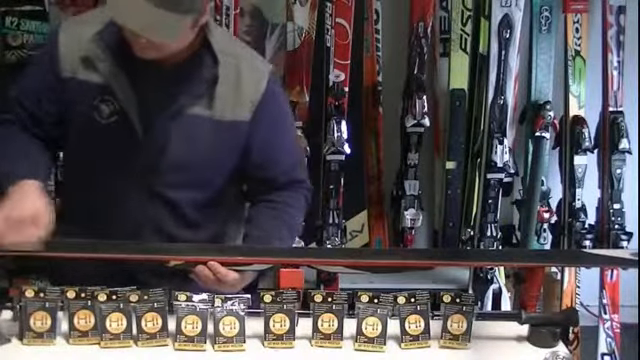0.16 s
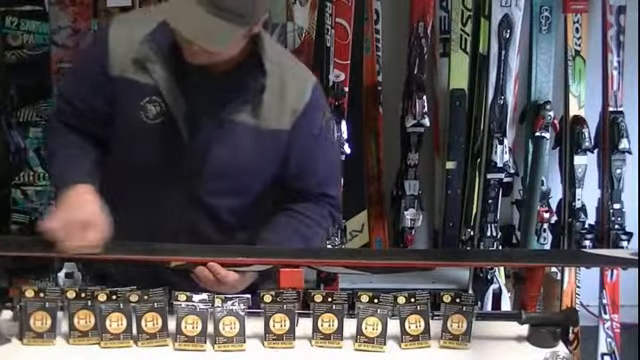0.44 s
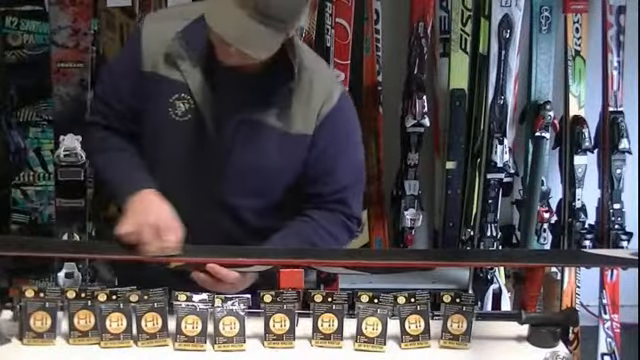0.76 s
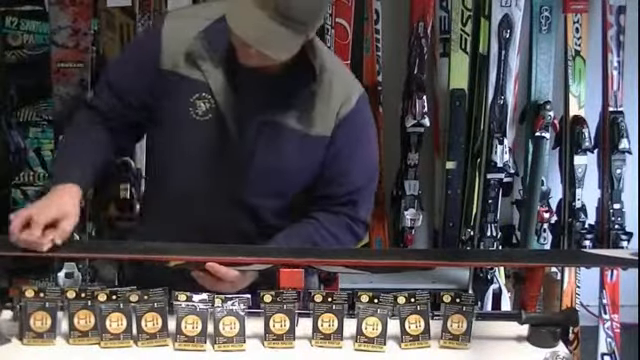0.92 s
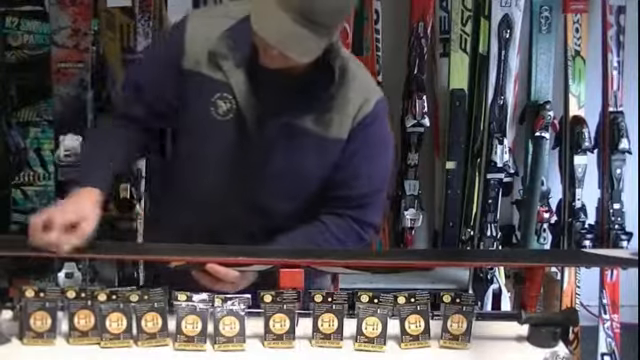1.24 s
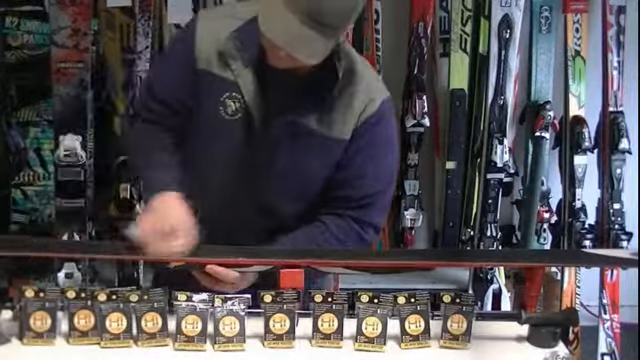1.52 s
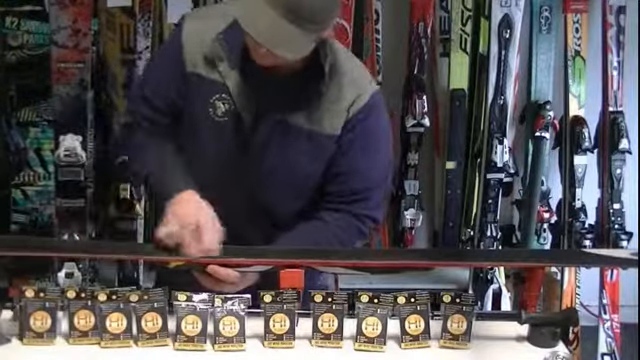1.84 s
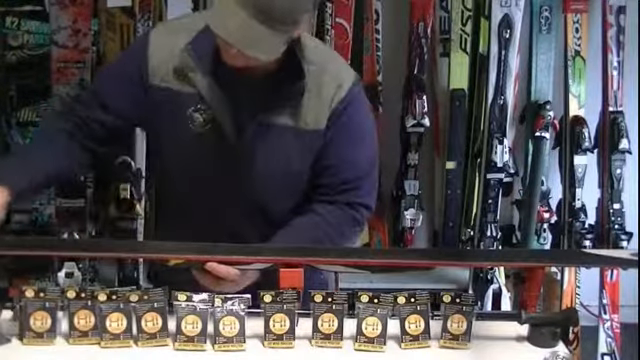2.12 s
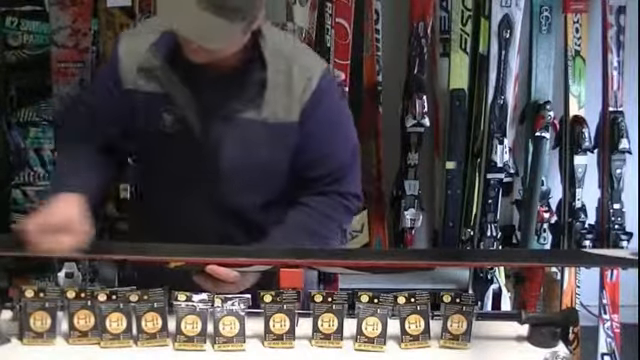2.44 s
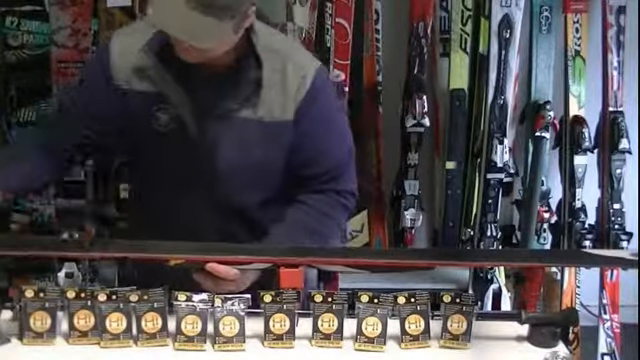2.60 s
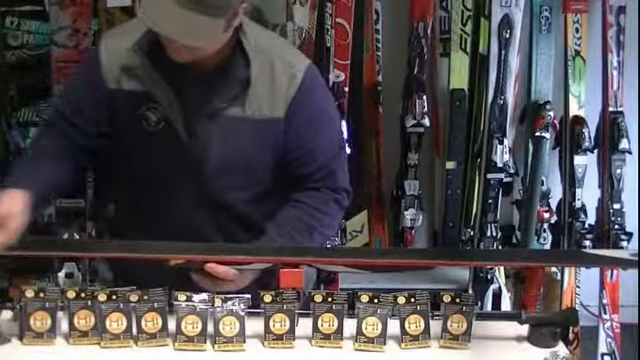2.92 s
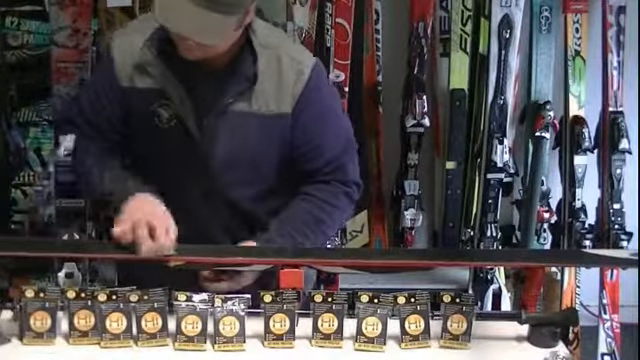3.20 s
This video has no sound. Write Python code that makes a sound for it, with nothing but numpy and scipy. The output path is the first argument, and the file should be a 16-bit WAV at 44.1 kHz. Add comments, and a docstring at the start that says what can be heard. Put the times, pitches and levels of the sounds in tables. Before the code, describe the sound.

Wax is rubbed on a ski base, already moving at 0 s: brisk strokes of about 0.17 s each, nearly six per second, until 2 s. One longer stroke spans 2.0-2.3 s, then strokes of about 0.2 s continue to the end near 3.4 s. Each swells into grainy scrape and bright hiss over hollow, woody ringing, dipping at turns; little knocks and squeaky scrapes vary it. Close, small room, faint floor.

```python
"""Wax is rubbed back and forth along a ski base clamped to a bench, already moving as the sound begins.
Quick strokes run to about 2 s, one longer stroke follows, then slightly slower ones last to the end.
Each stroke speeds up and slows to a turn: grainy friction noise scrapes, hisses, and rings the ski's modes.
Short coloured swells of noise, from low knocks to treble scrapes, dot the rubbing.
Short dense echoes and a phase-scattered side signal make the small room, over a faint steady floor."""
import sys
import numpy as np
from scipy import signal
from scipy.fft import rfft, irfft
from scipy.io import wavfile
from scipy.ndimage import map_coordinates

SR = 44100
rng = np.random.default_rng(int(sys.argv[2]) if len(sys.argv) > 2 else 0)


def output_pcm(signal):
    """Save a mono or channel-first signal as 16-bit PCM at the path in sys.argv[1].

    Samples are clipped to [-1, 1] before scaling.
    """
    pcm = np.clip(np.atleast_2d(signal).T, -1, 1) * 32767
    wavfile.write(sys.argv[1], SR, np.round(pcm).astype(np.int16))


N = 148176

# Background hiss: (frequency [Hz], level [dB per Hz])
FLOOR_COLOUR = [(20, -114), (60, -112), (120, -113), (300, -115), (2000, -120), (12000, -124)]
# Stereo spread: (frequency [Hz], side relative to mid [dB])
SIDE_LEVEL = [(60, -14), (250, -13), (500, -18), (1000, -14.5), (2000, -13), (4000, -8.5), (8000, -8),
              (12000, -10)]
# Stereo balance: (frequency [Hz], first channel relative to second [dB])
CHANNEL_LEAN = [(100, -0.86), (500, -.3), (1400, -0.11), (4200, 0.64), (8000, 1.5), (12000, 0)]
# Short coloured swells: (middle [s], length [s], resonance [Hz], level before SWELL_TRIM_DB [dB])
COLOURED_SWELLS = [(0.107, 0.034, 790, -52), (0.181, 0.02, 2280, -48), (0.353, 0.043, 7600, -50),
                   (0.419, 0.057, 1810, -43.5), (0.467, 0.02, 2600, -46), (.605, 0.036, 816, -53.5),
                   (0.77, 0.035, 1820, -46), (0.794, 0.039, 2350, -43), (1.025, 0.089, 8560, -48),
                   (1.143, 0.023, 1830, -55), (1.152, 0.046, 7400, -49), (1.184, .05, 2380, -46.5),
                   (1.253, .025, 2430, -46.5), (1.4, 0.033, 7600, -46.5), (1.438, .03, 2960, -47.5),
                   (1.535, 0.031, 820, -53), (1.587, .03, 1850, -47), (1.59, .035, 9500, -55),
                   (1.84, 0.023, 7540, -51), (1.863, .04, 1860, -53), (1.92, 0.041, 830, -55.5),
                   (2.192, 0.065, 1900, -50.5), (2.426, 0.028, 1670, -44), (2.54, 0.032, 1850, -53),
                   (2.573, 0.067, 847, -53.5), (2.688, 0.07, 3200, -47.5), (2.778, 0.04, 1750, -47),
                   (2.818, 0.046, 1680, -44.5), (2.893, 0.043, 8000, -43.5), (2.929, 0.034, 2470, -49),
                   (3.026, 0.028, 1750, -51), (3.095, 0.042, 720, -56), (3.21, .04, 880, -55),
                   (3.211, 0.03, 1660, -43.5), (3.243, 0.045, 3530, -49), (3.31, 0.061, 2380, -48)]
# Hand strokes: (start [s], share of the stroke at which it is fastest [0-1],
# roundness [factor on the speed exponent, under 1 bites at once], offset of the rub left at its first turn [dB],
# then offsets of ski body [dB], ski ring [dB], scrape [dB], hiss and fizz [dB])
HAND_STROKES = [(-.114, 0.44, 1.46, 6, 0, 0, 1.5, 1.5), (0.046, .58, 0.67, -2.5, 0.5, 1.4, 0.5, -2),
                (.224, 0.5, 1.16, 3, -1.5, -2.5, -1.3, -1.7), (.393, 0.47, 0.88, 1, 2, 0.5, 2, -0.3),
                (.574, 0.54, 0.92, 0, -0.4, -5, -1.3, -1), (.745, 0.47, 0.91, 1.5, 1, 1.5, -0.3, -1),
                (.938, 0.52, 0.87, 0.5, -2, -3, -0.8, -2.5), (1.103, 0.47, 0.8, -5, 0.2, 1, -2.5, -1.5),
                (1.278, .59, 0.9, 4, -1.5, -1.5, -3, -2.6), (1.46, 0.42, 0.95, -2.5, 1.5, 0, -0.5, -1.4),
                (1.635, 0.59, 0.84, 3, 0, -3.5, -3, -2.5), (1.81, .43, 0.75, -1, 0.5, -1, -2.5, -3.5),
                (1.984, 0.57, 0.85, 0, -1.8, 0, -1.5, -1.6), (2.334, 0.61, 1.1, 0.5, -0.6, 0.5, -0.8, -1),
                (2.557, 0.61, 1.07, 1.5, -1.3, 0.3, -1.3, 0.5), (2.747, 0.6, 0.86, 1, 1, 1.5, 0, -0.2),
                (2.954, 0.6, 1.05, 1, 0, -2.3, -1.1, 0.3), (3.153, 0.6, .9, 4, 0.2, 1.5, -0.5, 0)]
# Modes of the ski: (frequency [Hz], width [Hz], level at full speed before stroke offsets [dB per Hz])
RINGING_MODES = [(242, 16, -97), (333, 49, -99), (502.6, 28, -86), (603.4, 44, -88.5), (781, 32, -85),
                 (850.4, 39, -83), (955.5, 49, -85), (1131, 26, -83), (1646, 22, -77.5), (1751, 31, -77),
                 (1828, 41, -76), (1927, 31, -78.5), (2180, 23, -81.5), (2378, 59, -81.5), (2888, 48, -84),
                 (3380, 35, -84), (3713, 40, -84.5), (3956, 36, -84.5), (4260, 32, -85.5),
                 (5160, 79, -85.5)]
# Broad colours at full speed before stroke offsets: (frequency [Hz], level [dB per Hz])
BODY_COLOUR = [(40, -130), (120, -112), (185, -111), (235, -102), (350, -99), (430, -100), (520, -92),
               (720, -92.5), (830, -84.5), (1000, -92), (1300, -88.5), (1600, -88.5), (2500, -115)]
RING_COLOUR = [(250, -140), (900, -112), (1450, -95.5), (1600, -84.5), (1850, -88), (2050, -85.5),
               (2600, -88.5), (5000, -120)]
SCRAPE_COLOUR = [(250, -140), (1000, -110), (1800, -92.5), (2250, -84.5), (2500, -84), (2680, -85),
                 (2900, -83.5), (3500, -85), (4400, -87), (5500, -91), (8000, -102), (12500, -112)]
HISS_COLOUR = [(300, -140), (2000, -110), (3800, -93.5), (4800, -83), (5250, -79.5), (5900, -82.5),
               (6800, -86.5), (7800, -85), (9200, -89.5), (10500, -92.5), (12300, -99)]
FIZZ_COLOUR = [(2000, -145), (6000, -115), (8500, -95.5), (9800, -88.5), (10900, -89.5), (11700, -86.5),
               (12300, -100)]
# Friction laws: (power exponent of speed before roundness, level at a turn before its offset [dB],
# flutter [dB], grain spread [dB])
BODY_LAW, RING_LAW = (0.53, -12, 1.6, 1.9), (0.6, -9.5, 1.5, 2)
SCRAPE_LAW, HISS_LAW = (0.74, -9, 0.72, 1.5), (1.2, -14.5, 0.4, 2.3)
FIZZ_LAW = (2, -20.5, 1.5, 4)

LAST_TURN_S = 3.37
FLUTTER_HZ, GRAINS_PER_S = 20, 8000
GRAIN_SHARE = 0.52  # share of the rub's power, before flutter
BIGGEST_SLIP = 4.9  # in units of the grain spread
BODY_TOP_HZ = 1400  # modes below follow the body's friction, those above the ring's
SWELL_Q, SWELL_TRIM_DB = 4.7, -3  # Q of each of two equal resonances in a row
PATCH_DB, PATCH_S, PATCH_HZ = 1.81, 0.035, 300.5
ROOM_T60_S, ROOM_DB = 0.096, -13.5
EDGE_HZ = 12200


def amp(db):
    """Turns decibels into gain."""
    return 10 ** (np.asarray(db) / 20)


def evened(x):
    """Scales to rms 1."""
    return x / np.sqrt(np.mean(x ** 2) + 1e-20)


def read(points):
    """Draws a (frequency [Hz], level [dB]) table as a gain for every frequency."""
    hz, db = np.transpose(points)
    bins_hz = np.fft.rfftfreq(N, 1 / SR)
    return amp(np.interp(np.log(bins_hz + 1), np.log(hz + 1), db))


def resonance(hz, width_hz):
    """Gives the response of one damped mode, with gain 1 at its centre."""
    f = np.fft.rfftfreq(N, 1 / SR) + 1e-6
    return 1 / (1 + 1j * (f * f - hz * hz) / (f * width_hz))


def colour(x, response):
    """Gives white sound of rms 1 the spectral density of the response."""
    return irfft(rfft(x) * response, N) * np.sqrt(SR / 2)


def background_floor():
    """Faint steady noise, independent in the two channels."""
    return colour(rng.standard_normal((2, N)), read(FLOOR_COLOUR))


def reflections(x, t60_s):
    """Dense echoes from the bench and the walls: random taps dying away by 60 dB in t60_s."""
    t = np.arange(SR // 2) / SR
    decay = np.exp(-np.log(1000) * t / t60_s)
    taps = rng.standard_normal(len(t)) * decay * (t > 0.002)
    return signal.fftconvolve(x, taps / np.linalg.norm(taps))[:N]


def diffuse(x, size):
    """Sound scattered by the walls keeps its level and colour but arrives with random phase."""
    z = signal.stft(x, nperseg=size)[2]
    turned = z * np.exp(2j * np.pi * rng.random(z.shape))
    scattered = signal.istft(turned, nperseg=size)[1][:N]
    return np.std(x) * evened(scattered)


def room(dry):
    """Adds echoes, a scattered side signal and a gentle lean between the channels."""
    mid = dry + amp(ROOM_DB) * reflections(dry, ROOM_T60_S)
    side = rfft(diffuse(mid, size=512)) * read(SIDE_LEVEL)
    lean = np.sqrt(read(CHANNEL_LEAN))  # half the lean goes to each channel
    first = (rfft(mid) + side) * lean
    second = (rfft(mid) - side) / lean
    return irfft(np.array([first, second]), N)


def coloured_swells():
    """Resonant noise, from low knocks to treble scrapes, swells and fades in cosine arches."""
    t, out = np.arange(N) / SR, np.zeros(N)
    noise = rng.standard_normal(N)
    for middle_s, length_s, hz, db in COLOURED_SWELLS:
        coloured = evened(colour(noise, resonance(hz, hz / SWELL_Q) ** 2))
        arch = np.cos(np.pi * np.clip((t - middle_s) / length_s, -0.5, 0.5))
        out += amp(db + SWELL_TRIM_DB) * coloured * arch
    return out


def stroke_level(levels_db, exponent, turn_db):
    """Rubbing grows with a power of hand speed; some is left at each turn."""
    starts, fastest, roundness, left_db = np.transpose(HAND_STROKES)[:4]
    t = np.arange(N) / SR
    place = np.interp(t, np.append(starts, LAST_TURN_S), np.arange(len(starts) + 1))
    stroke = place.astype(int)
    skew = np.log(0.5) / np.log(fastest)  # puts the sine's peak at the fastest share
    speed = np.sin(np.pi * (place - stroke) ** skew[stroke])
    # half the power exponent, as this is an amplitude
    sliding = amp(levels_db)[stroke] * speed ** (exponent * roundness[stroke] / 2)
    left_at_turn = amp(turn_db + np.interp(t, starts, left_db))
    return np.hypot(sliding, left_at_turn)


def friction(levels_db, law):
    """Tiny random slips and smooth noise flutter together and follow the strokes."""
    exponent, turn_db, flutter_db, spread_db = law
    level = stroke_level(levels_db, exponent, turn_db)
    slips = (rng.random(N) < GRAINS_PER_S / SR) * rng.choice([-1, 1], N)
    slip_sizes = np.minimum(rng.exponential(1, N), BIGGEST_SLIP)
    slips = slips * amp(spread_db * slip_sizes)
    smooth = rng.standard_normal(N)
    rub = np.sqrt(GRAIN_SHARE) * evened(slips) + np.sqrt(1 - GRAIN_SHARE) * smooth
    flutter_band = resonance(FLUTTER_HZ, 2 * FLUTTER_HZ) ** 2
    flutter = evened(irfft(rfft(rng.standard_normal(N)) * flutter_band, N))
    return level * evened(rub * amp(flutter_db * flutter))


def ski(body_db, ring_db):
    """Friction excites a hollow low body, a brighter ring and the ski's single modes."""
    body = colour(friction(body_db, BODY_LAW), read(BODY_COLOUR))
    ring = colour(friction(ring_db, RING_LAW), read(RING_COLOUR))
    out = body + ring
    low, high = friction(body_db, BODY_LAW), friction(ring_db, RING_LAW)
    for hz, width_hz, db in RINGING_MODES:
        drive = low if hz < BODY_TOP_HZ else high
        # the wider second resonance steepens the skirts
        mode = resonance(hz, width_hz) * resonance(hz, 5 * width_hz)
        out += colour(drive, amp(db) * mode)
    return out


def wander(x, size):
    """The colour wanders as the wax moves along the base: time-frequency patches swell and fade."""
    hz, t, z = signal.stft(x, SR, nperseg=size)
    field = rng.standard_normal((size, size))
    places = np.meshgrid(t / PATCH_S, hz / PATCH_HZ)
    patches = evened(map_coordinates(field, places, order=1, mode="wrap"))
    return signal.istft(z * amp(PATCH_DB * patches), SR, nperseg=size)[1][:N]


def wax(scrape_db, hiss_db):
    """The contact itself: a scrape, a hiss that needs more speed, and a fizz at the fastest."""
    scrape = colour(friction(scrape_db, SCRAPE_LAW), read(SCRAPE_COLOUR))
    hiss = colour(friction(hiss_db, HISS_LAW), read(HISS_COLOUR))
    fizz = colour(friction(hiss_db, FIZZ_LAW), read(FIZZ_COLOUR))
    return scrape + hiss + fizz


def scene():
    """Sets the rubbing in front of the microphone, widened by the room, over a faint floor."""
    body_db, ring_db, scrape_db, hiss_db = np.transpose(HAND_STROKES)[4:]
    contact = wander(wax(scrape_db, hiss_db), size=1024)
    rubbing = ski(body_db, ring_db) + contact + coloured_swells()
    return room(rubbing) + background_floor()


def record(dry):
    """Applies the recorder's band limit, a steep low-pass."""
    low_pass = signal.firwin(801, EDGE_HZ, window=("kaiser", 9), fs=SR)
    return signal.oaconvolve(dry, low_pass[None], "same")


dry = scene()
out = record(dry)
output_pcm(out)
```